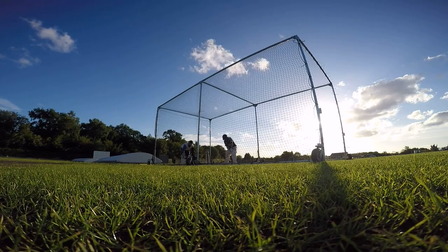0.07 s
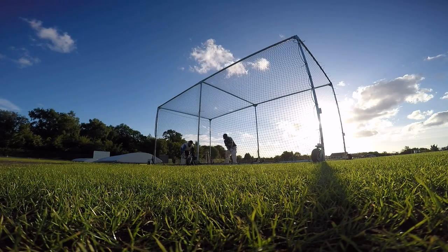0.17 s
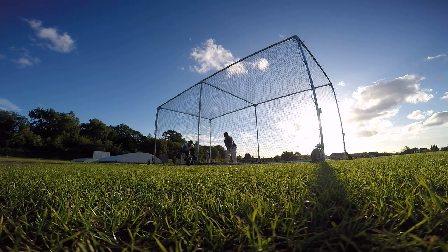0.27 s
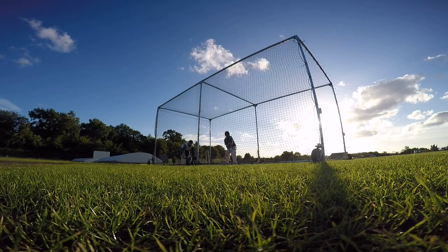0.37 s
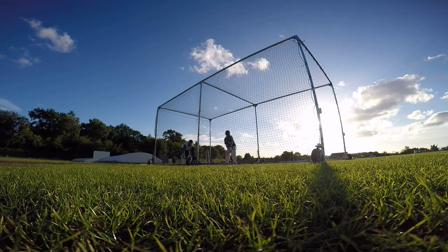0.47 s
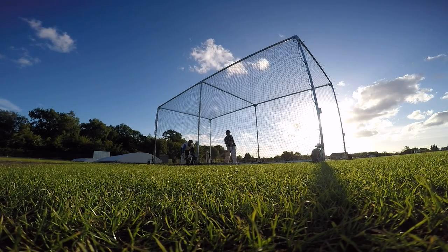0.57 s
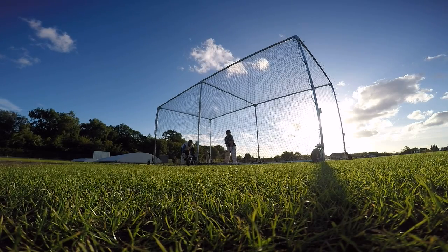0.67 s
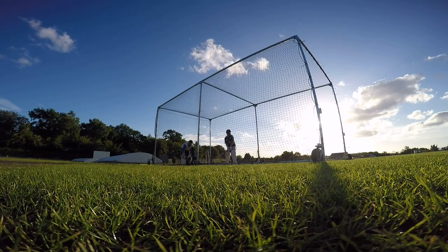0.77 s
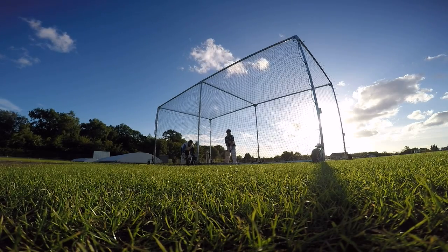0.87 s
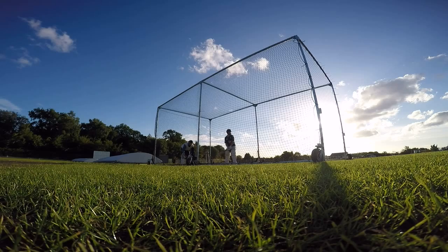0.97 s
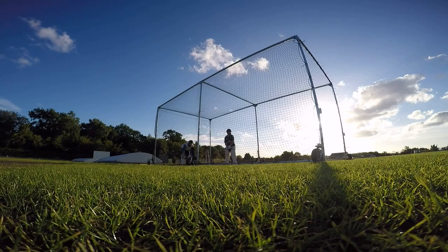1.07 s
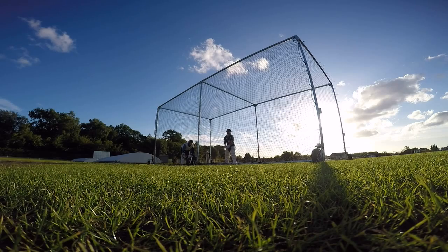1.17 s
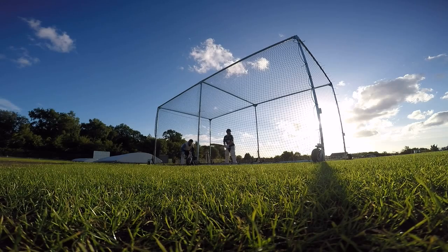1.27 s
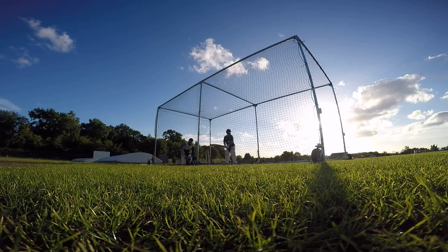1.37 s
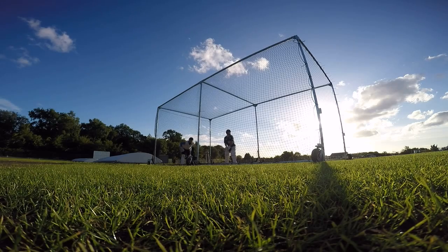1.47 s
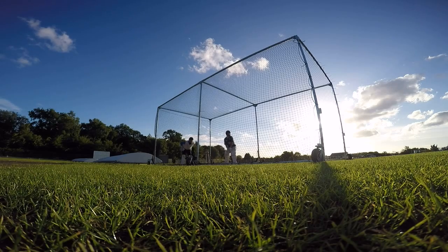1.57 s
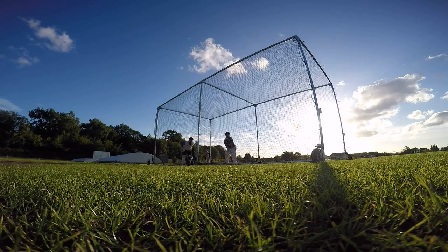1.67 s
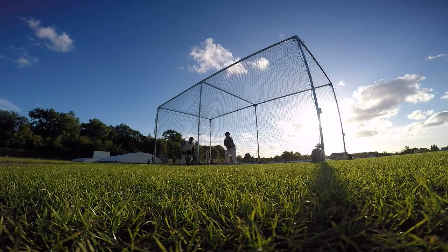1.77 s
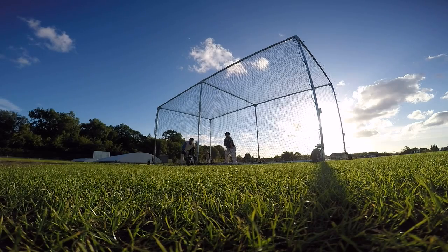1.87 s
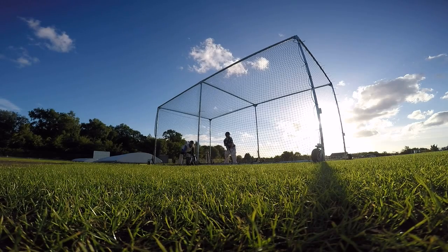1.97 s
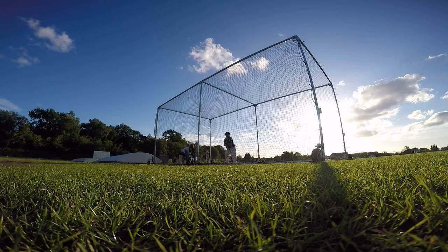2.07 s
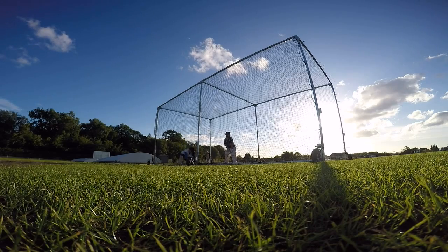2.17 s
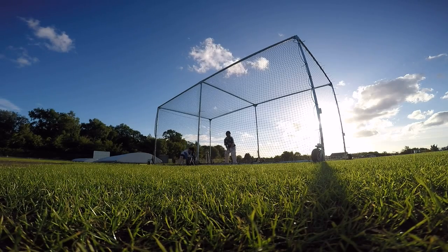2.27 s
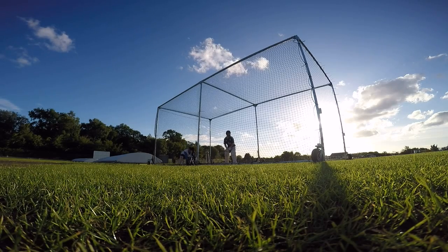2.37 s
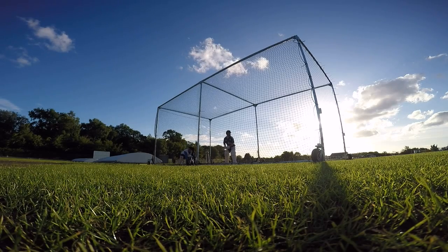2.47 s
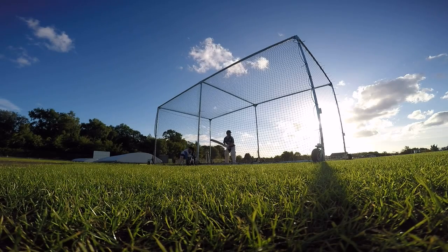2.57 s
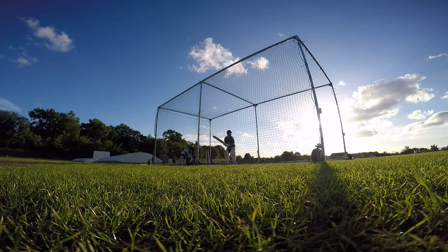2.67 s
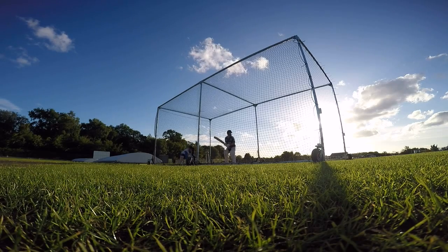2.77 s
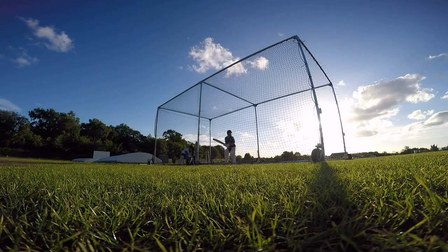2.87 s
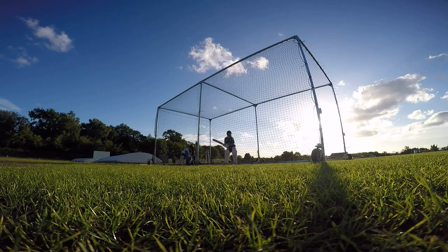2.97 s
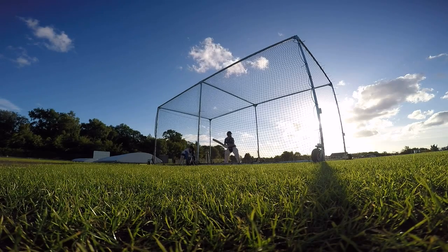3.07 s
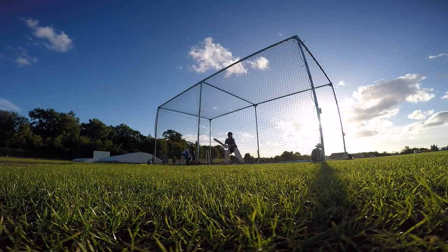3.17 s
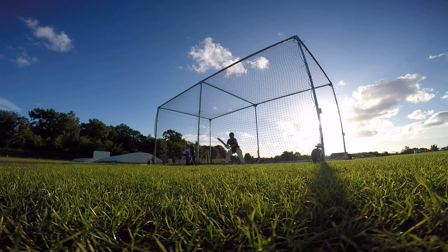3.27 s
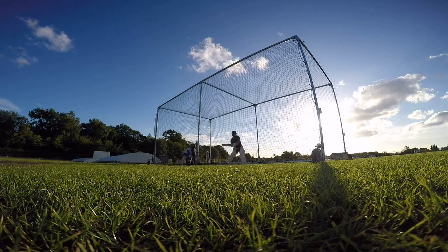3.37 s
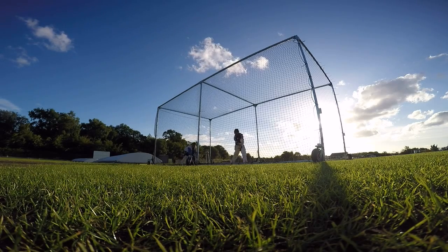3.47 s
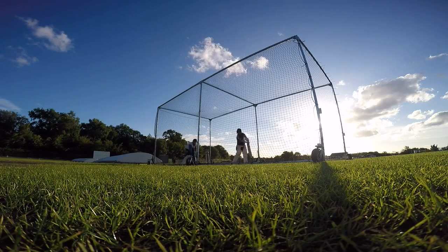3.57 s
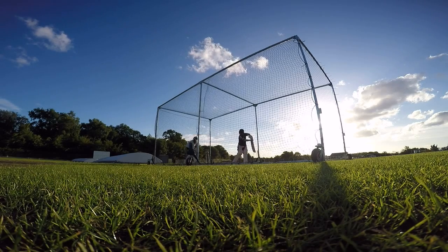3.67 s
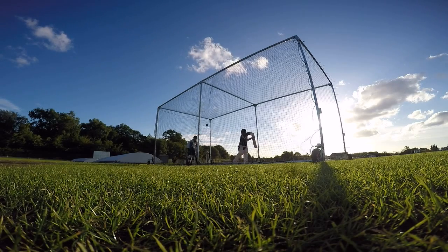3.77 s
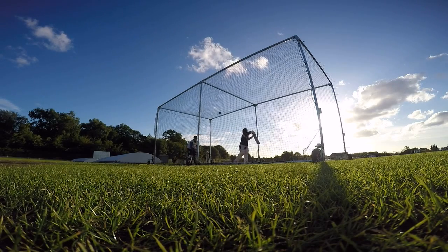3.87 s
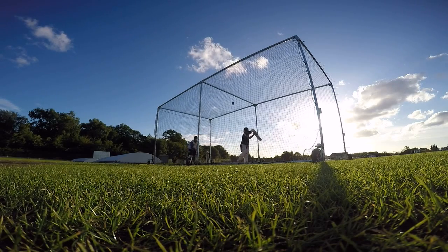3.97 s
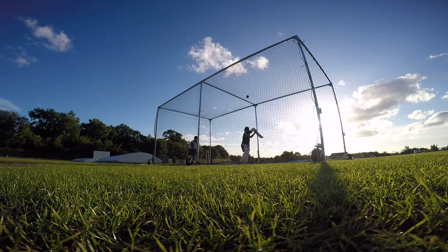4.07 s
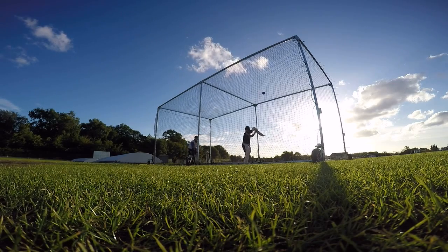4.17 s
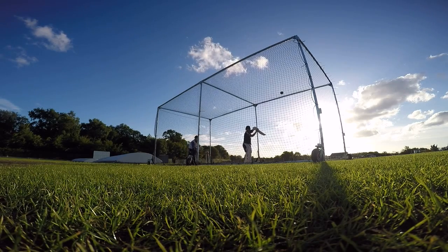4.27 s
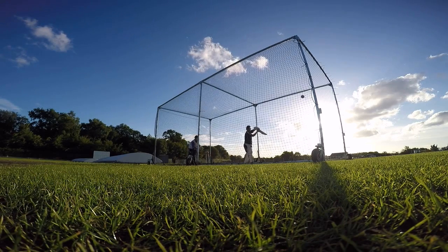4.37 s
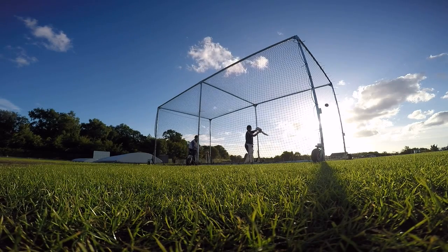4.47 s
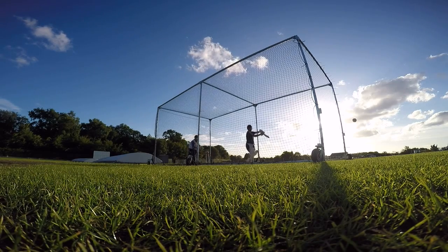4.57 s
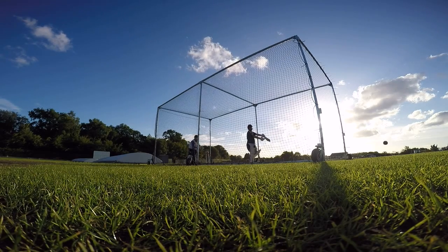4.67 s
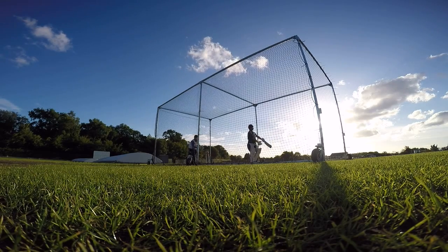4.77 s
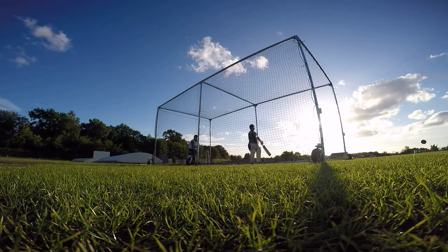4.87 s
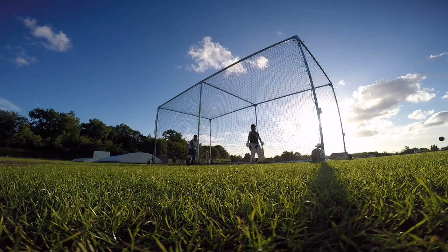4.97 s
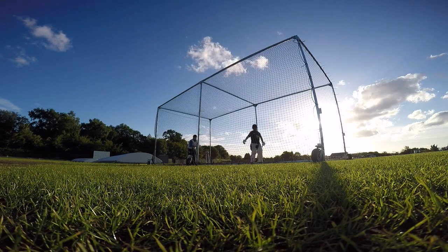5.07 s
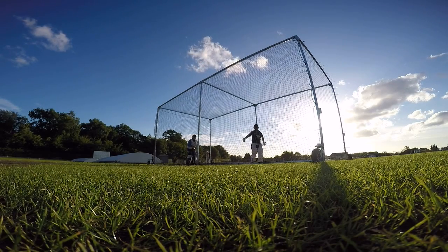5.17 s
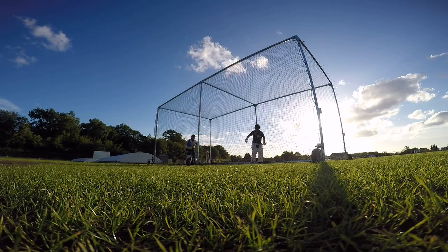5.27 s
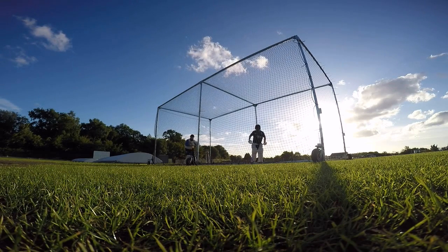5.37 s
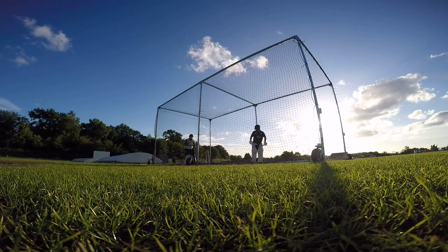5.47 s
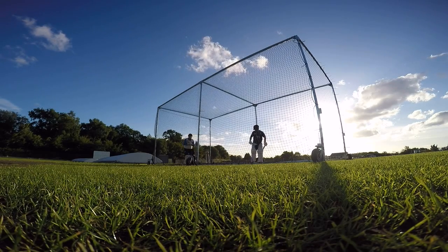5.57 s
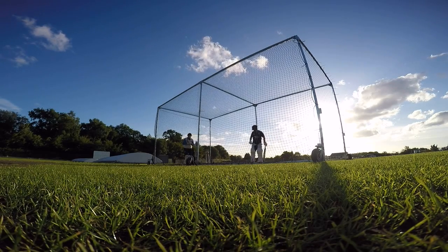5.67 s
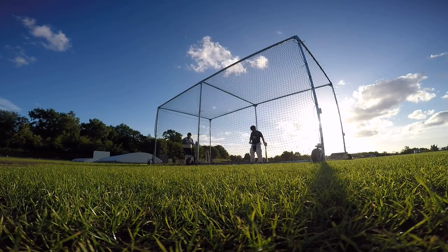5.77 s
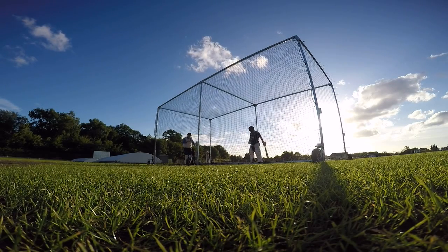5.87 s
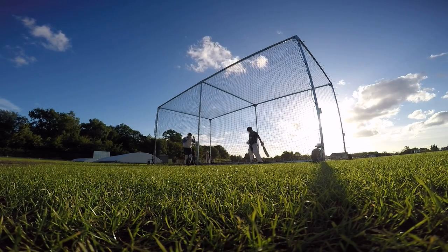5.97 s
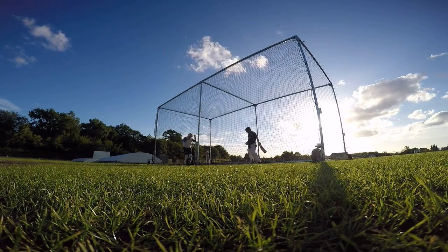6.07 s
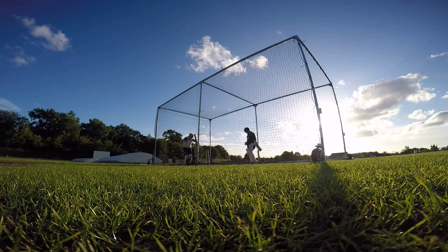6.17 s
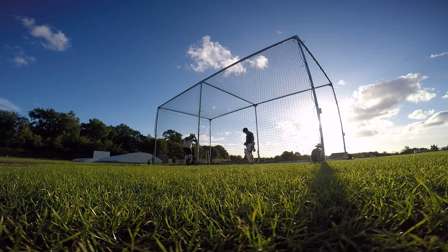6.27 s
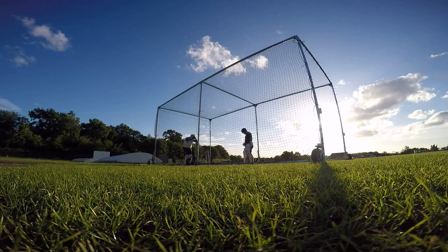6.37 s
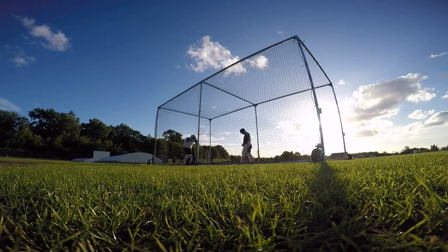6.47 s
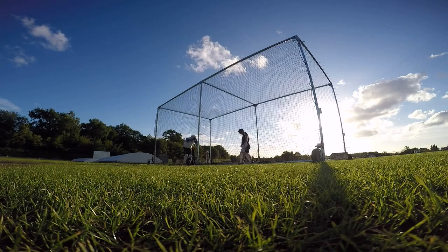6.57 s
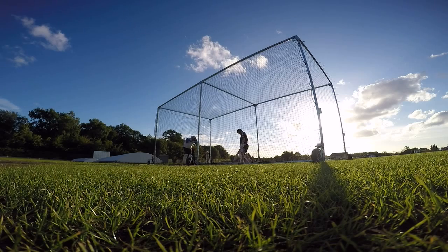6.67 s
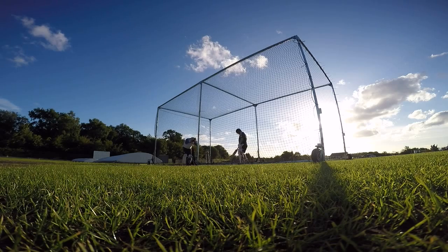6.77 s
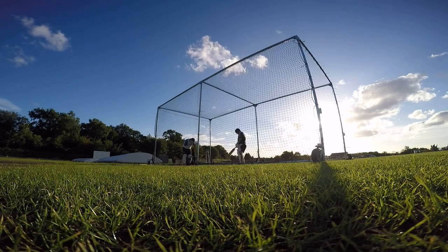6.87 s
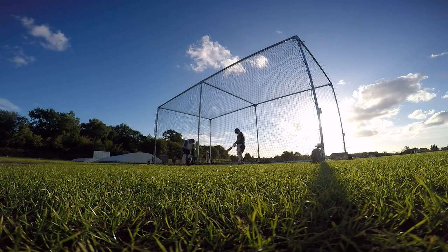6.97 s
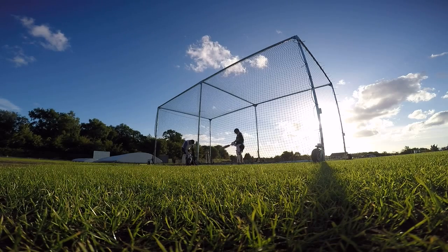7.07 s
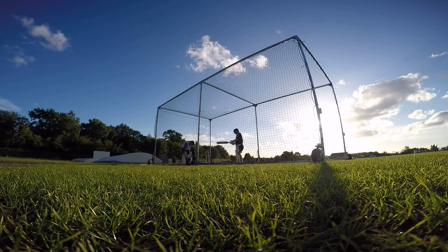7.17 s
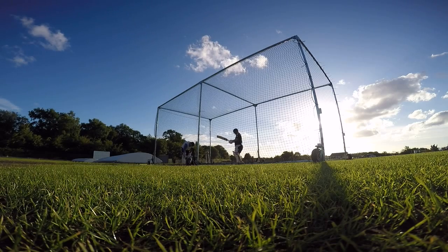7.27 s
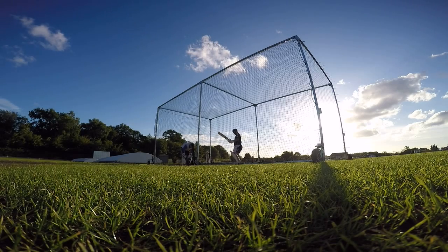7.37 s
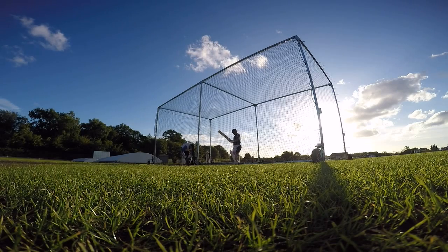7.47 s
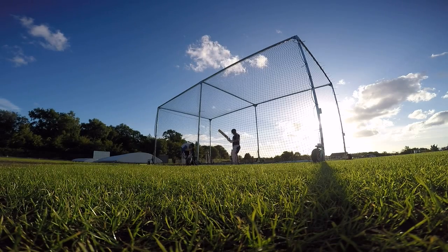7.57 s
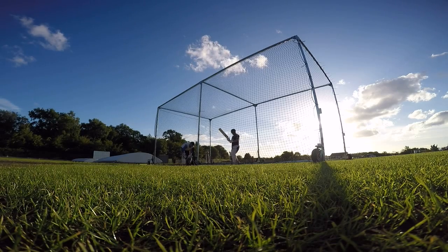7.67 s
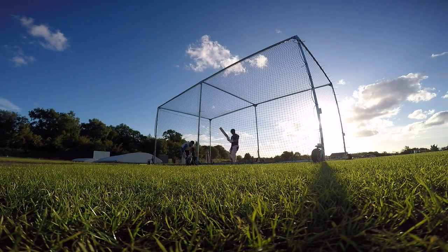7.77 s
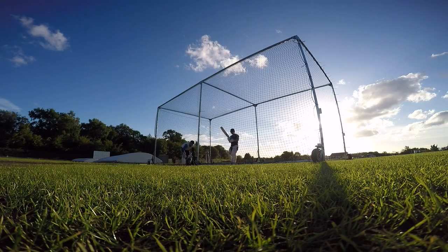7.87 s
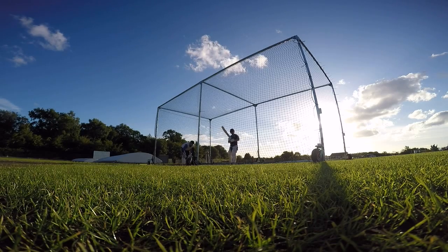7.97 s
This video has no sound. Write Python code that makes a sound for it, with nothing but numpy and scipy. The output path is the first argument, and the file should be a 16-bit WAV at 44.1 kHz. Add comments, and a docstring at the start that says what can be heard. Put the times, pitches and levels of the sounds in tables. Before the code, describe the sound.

Open grass field, heard by a small camera microphone with light wind rumble, faint hiss and a very thin high whine. A far propeller plane drones low throughout, swelling and fading unevenly, its pitch sinking slightly. A dull, dry bat knock lands at 0.05 s and another at 1.7 s, with faint thuds around them. Wind puffs near 0.8 and 2 s. From 2.7 s come soft heel-and-sole footfalls, strongest at 2.9, 3.2 and 3.4 s, with cloth rustle and a short hollow tok at 3.25 s. At 3.53 s one hard hit cracks, far louder, clipped, briefly ringing, with a quick echo; the background ducks and recovers within about 0.6 s. Netting ticks and crackles around 3.6-4 s, and the ball thuds into the net at 4.03 s. Muffled steps follow at 4.5, 4.8-4.9, 5.3 and 5.8 s. Then faint grass shuffles and the swelling drone remain until 8 s.

```python
"""Batting practice on grass

Two dull knocks of bat on ball, then one hard hit that overloads the microphone: gliding tones with ring and crack.
Footfalls, faint echoes of the hits and the ball dropping into the net are short pulses, some with a scuff.
Clothes, netting and gear rustle and tick as swells of gritty noise, with one short hollow tok.
A far propeller plane drones and sinks in pitch: harmonics over exhaust noise. Wind rumbles lightly as coloured
noise, and the camera's electronics whine faintly as two steady tones."""
import sys
import numpy as np
from scipy import signal
from scipy.fft import rfft, irfft, next_fast_len
from scipy.io import wavfile
from scipy.ndimage import uniform_filter1d, map_coordinates

SR = 44100
rng = np.random.default_rng(int(sys.argv[2]) if len(sys.argv) > 2 else 0)


def generate_wav(sig):
    """Save sig (samples, or channels by samples) to the path in sys.argv[1] as 16-bit PCM at SR."""
    pcm = np.round(np.clip(np.atleast_2d(sig).T, -1, 1) * 32767).astype(np.int16)
    wavfile.write(sys.argv[1], SR, pcm)


N = 354563  # length in samples, about 8 s


def amp(db):
    """Turn decibels into a gain."""
    return 10 ** (np.asarray(db) / 20)


def unit(x):
    """Scale a sound to rms 1."""
    return x / np.sqrt(np.mean(x ** 2) + 1e-20)


def along(points, hz):
    """Read a table of (f/Hz, value) at any frequency, on a log frequency axis."""
    f, v = np.transpose(points)
    return np.interp(np.log(hz + 1), np.log(f + 1), v)


def clock():
    """Give the time of each sample in seconds."""
    return np.arange(N) / SR


def curves(rows):
    """Join the points of each column after the time by straight lines, with a value for each sample."""
    s, *columns = np.transpose(rows)
    return [np.interp(clock(), s, column) for column in columns]


def wobble(rate):
    """Draw a smooth random curve with `rate` random points a second."""
    points = rng.standard_normal(int(N * rate / SR) + 4)
    return map_coordinates(points, [clock() * rate])


def filtered(x, response):
    """Multiply x by a gain that depends on frequency."""
    size = next_fast_len(len(x) + 8192)
    hz = np.fft.rfftfreq(size, 1 / SR)
    return irfft(rfft(x, size) * response(hz), size)[:len(x)]


def coloured(count, spectrum):
    """Make noise of rms 1 whose balance of low and high follows the spectrum."""
    return unit(filtered(rng.standard_normal(count), lambda hz: amp(along(spectrum, hz))))


def add(track, s, sound):
    """Mix a sound into the track from time s on."""
    i = max(round(s * SR), 0)
    track[i:i + len(sound)] += sound[:max(N - i, 0)]


# the camera's whine, one row: f/Hz, level/dB (rms), level/dB of the octave above (rms)
WHINE_TONE = (6308.7, -73.5, -74.5)
FRAME_HZ = 29.97  # frames per second


def whine():
    """A thin tone from the camera's electronics, with its octave; the lower one flips sign with every frame."""
    hz, db, octave_db = WHINE_TONE
    phase = 2 * np.pi * hz * clock()
    flip = np.tanh(10 * np.sin(np.pi * FRAME_HZ * clock()))
    tone = amp(db) * flip * np.sin(phase)
    octave = amp(octave_db) * np.sin(2 * phase)
    return np.sqrt(2) * (tone + octave)


# puffs of wind on the microphone: t/s of the middle, half length/s, level/dB before the buffet trim
GUSTS = [(.45, 0.07, -36), (0.79, .12, -29.5), (1.982, 0.1, -30.5), (2.074, 0.027, -22),
         (2.755, 0.17, -37.5), (3.202, 0.25, -31), (3.72, .08, -28), (4.94, .04, -30.5)]
CALM_DB = -40  # the breeze between the puffs, before the same trim
# colour of the wind's rumble: f/Hz, relative level/dB
BUFFET_COLOUR = [(8, -3.5), (25, 1.5), (38, 4), (60, -3.5), (90, -7), (150, -20), (300, -41), (1000, -82.5)]
# colour of the even hiss: f/Hz, relative level/dB
HISS_COLOUR = [(200, 2), (1000, 13.5), (2500, 3), (4200, 2), (6000, -1.5), (8000, -5.5), (12000, -8),
               (13500, -6.5), (15000, -34)]


def breeze(buffet_db, air_db, eddy_db, eddies_per_s):
    """Soft buffeting that swells with each puff and churns in small eddies, under a faint even hiss."""
    power = amp(CALM_DB) ** 2
    for s, half, db in GUSTS:
        power = power + amp(db) ** 2 * np.exp(-((clock() - s) / half) ** 2)
    churn = amp(buffet_db + eddy_db * wobble(eddies_per_s))
    rumble = np.sqrt(power) * churn * coloured(N, BUFFET_COLOUR)
    return rumble + amp(air_db) * coloured(N, HISS_COLOUR)


# pitch of the plane's propeller: t/s, f/Hz at which the blades pass
BLADE_RATE = [(0, 108.7), (1, 108.4), (1.6, 107), (4.4, 104.6), (7, 101.7), (8.04, 101.1)]
# its tones, fading in and out on the way through the air, before trims:
# t/s, level/dB of the first, of the second, of the third
DRONE_LEVELS = [(0.0, -22, -41.5, -37), (0.32, -29.5, -43, -54.5), (0.5, -29.5, -41.5, -48),
                (0.95, -32.0, -60.5, -58), (1.15, -40, -52, -58.5), (1.8, -32.5, -53, -56),
                (2.45, -46, -59.0, -67.5), (2.8, -44, -63, -61), (3.05, -32.5, -53, -74),
                (4.1, -33, -50.5, -63.5), (4.36, -28.5, -48, -50), (4.7, -37, -51.5, -63),
                (4.86, -29, -49, -65), (5.02, -38.5, -42.5, -53.5), (5.5, -24.5, -40, -43),
                (5.95, -26, -54.5, -54.5), (6.18, -41, -58, -55), (6.33, -31.5, -60.5, -52.5),
                (6.68, -38.5, -51.5, -57.5), (7.02, -25.5, -49.5, -46.5), (7.25, -24.0, -39.5, -50),
                (7.55, -27.5, -40, -39), (7.85, -24.0, -39.5, -57.5), (8.04, -23, -40, -62)]
# its exhaust roar: t/s, level/dB before the roar trim
ROAR_LEVEL = [(0, -44), (.25, -51), (1.5, -56), (2.5, -57.5), (3.6, -50), (4.1, -55), (5.5, -54.5),
              (6.7, -56.5), (7.55, -52), (8.04, -55.5)]
# colour of the exhaust: f/Hz, relative level/dB
EXHAUST_COLOUR = [(40, -24), (130, 4), (250, 5), (400, 4.5), (550, -1), (800, -14), (1200, -24.5),
                  (2200, -74), (5000, -51)]
FADE_GROWTH_DB = 1.58  # extra flutter of each higher harmonic, reached in full only in deep fades


def plane(tone_db, overtone_db, upper_db, roar_db, flutter_db):
    """Propeller harmonics over exhaust noise; turbulence makes higher ones flutter more, most of all in fades."""
    phase = 2 * np.pi * np.cumsum(curves(BLADE_RATE)[0]) / SR
    first, second, third = curves(DRONE_LEVELS)
    # the fourth harmonic follows the third, at its own trim
    levels = [first + tone_db, second + overtone_db, third + overtone_db, third + upper_db]
    tones = np.zeros(N)
    for k, db in enumerate(levels, 1):
        faded = np.clip((db.max() - db) / 12, .35, 1)
        flutter = faded * (flutter_db + (k - 1) * FADE_GROWTH_DB) * wobble(9)
        angle = k * (phase + 0.1 * wobble(7)) + rng.uniform(0, 2 * np.pi)
        tones += amp(db + flutter) * np.sin(angle)
    roar_level = curves(ROAR_LEVEL)[0] + roar_db + 1.2 * wobble(9)
    return np.sqrt(2) * tones + amp(roar_level) * coloured(N, EXHAUST_COLOUR)


# rubs of clothes and netting, and one short hollow tok near 400 Hz:
# t/s of the middle, half length/s, level/dB (rms), centre f/Hz, width/octaves
RUSTLES = [(2.939, .036, -54.5, 1890, .63), (2.961, 0.01, -43, 480, 0.81), (3.06, .079, -60.5, 1560, 0.74),
           (3.18, 0.045, -56.5, 2180, .5), (3.253, 0.0074, -30, 400, .1), (3.49, 0.032, -51.5, 2500, 0.99),
           (3.631, .013, -42, 600, .97), (3.679, .012, -51, 3100, .9), (3.745, 0.078, -56.5, 3300, 2.3),
           (3.98, 0.048, -57, 1700, 1.9), (4.119, 0.2, -62, 1500, 0.61)]


def rustles_and_tok():
    """List the rubs of clothes and netting as broad bands, and the hollow tok as a very narrow one."""
    return list(RUSTLES)


# light shuffles in the grass: t/s, half length/s, level/dB (rms)
SHUFFLES = [(1.707, .012, -62), (1.944, .008, -59.5), (5.014, 0.0093, -55), (5.759, 0.016, -59.5),
            (5.87, .06, -64), (6.324, 0.016, -58), (6.7, 0.088, -65.5), (6.889, .016, -61),
            (7.302, .019, -62), (7.636, .012, -59), (7.72, 0.23, -68)]
SHUFFLE_HZ, SHUFFLE_OCTAVES = 2130, 0.93


def shuffles():
    """List the small movements in the grass as soft, broad rubs."""
    return [(s, half, db, SHUFFLE_HZ, SHUFFLE_OCTAVES) for s, half, db in SHUFFLES]


# sharp little ticks of gear and netting: t/s, level/dB (rms), f/Hz
TICKS = [(3.371, -39, 2980), (3.5851, -28.5, 3700), (3.664, -39.5, 3800), (3.755, -48, 4220),
         (3.941, -39.5, 1690), (3.959, -32, 1390), (4.262, -50.5, 2860), (4.801, -38.5, 3050)]
TICK_HALF_S, TICK_OCTAVES = 0.00054, 0.28
# the struck netting crackles: t/s at one end, signed span/s to the other, level/dB of a tick (rms), f/Hz
NET_CRACKLE = (4, -0.16, -53, 3700)


def ticks():
    """List the ticks as very short narrow rubs, with eight more at random moments for the struck net."""
    end, span, net_db, net_hz = NET_CRACKLE
    crackle = [(end + span * u, net_db, net_hz) for u in rng.random(size=8)]
    return [(s, TICK_HALF_S, db, hz, TICK_OCTAVES) for s, db, hz in list(TICKS) + crackle]


# paired contacts, played by scuffs and by impacts: mostly feet, heel then sole;
# the one at 3.585 s is the hard hit's echo, the one near 4.03 s the ball dropping into the net
# t/s of the second contact, level/dB (peak), thud f/Hz, click level/dB against the thud,
# lead/s of the first contact, its level/dB (peak), scuff level/dB (rms)
PAIRS = [(2.698, -34.5, 356, -19, 0.00686, -24.5, -46), (2.8901, -11.5, 293, -23, .012, -26.5, -39),
         (3.219, -13, 380, -26.5, 0.01, -32, -35.5), (3.585, -11, 363, -25, .0036, -18, -42),
         (4.0312, -16.5, 460, -24, 0.019, -31, -39.5), (4.4647, -21.5, 396, -28, .0117, -24, -45.5),
         (4.8986, -29, 400, -16, 0.0036, -26.5, -42), (5.3421, -21.5, 405, -20, 0.012, -26, -59)]
SCUFF_HZ, SCUFF_OCTAVES = 850, 0.86
SCUFF_SPREAD = 0.53  # half length as a share of the time between the two contacts


def scuffs():
    """List a soft rub midway through each pair; for a foot, the sole brushing the grass as it rolls."""
    return [(s - lead / 2, SCUFF_SPREAD * lead, scuff_db, SCUFF_HZ, SCUFF_OCTAVES)
            for s, *_, lead, first_db, scuff_db in PAIRS]


def gritty_noise(swells, grain_db, grains_per_s, top_hz):
    """Short swells of noise whose uneven loudness makes them gritty, each in its own band."""
    track = np.zeros(N)
    t = np.arange(-SR // 2, SR // 2) / SR
    for s, half, db, centre_hz, octaves in swells:
        knots = rng.standard_normal(SR // 20)
        near = np.abs(t) < 4 * half + .01  # only the stretch where the swell is heard
        grit = np.interp((t[near] - t[0]) * grains_per_s, np.arange(len(knots)), knots)
        grains = rng.standard_normal(len(t))[near] * amp(grain_db * grit)

        def band(hz):
            hump = np.exp(-.5 * (np.log2((hz + 1) / centre_hz) / octaves) ** 2)
            return hump / (1 + (hz / top_hz) ** 6)

        swell = np.exp(-.5 * (t[near] / half) ** 2)
        sound = swell * filtered(grains, band)
        level = amp(db) * np.linalg.norm(swell) / np.linalg.norm(sound)
        add(track, s + t[near][0], level * sound)
    return track


# single dull thuds: footfalls, landings, the ball near 3.98 s, the faint echo after each of the first two
# knocks, and a low lump of body just after the second knock # t/s, level/dB (peak), thud f/Hz, click level/dB
# against the thud
THUDS = [(.091, -31.5, 640, -30), (1.7035, -23.5, 213, -34), (1.737, -31.5, 510, -29),
         (2.3047, -32.5, 396, -18.5), (3.3691, -16, 348, -29.5), (3.625, -27, 450, -24),
         (3.979, -23.5, 427, -22), (4.801, -18, 337, -19), (5.7587, -32, 400, -14)]
# colour of a thud, shifted to each one's own pitch: f/Hz, relative level/dB
THUD_COLOUR = [(40, -65.5), (120, 2), (240, -0.5), (330, 2.5), (400, 7.5), (500, 2.5), (700, -13),
               (900, -46), (2000, -60), (5000, -79)]
THUD_HZ = 400  # the pitch the thud colour is written for
# colour of a click: f/Hz, relative level/dB
CLICK_COLOUR = [(150, -14.5), (700, 4.5), (1600, 3.5), (2200, -2.5), (2600, -2.5), (3100, -8),
                (3700, -45.5), (6000, -33.5), (15000, -59)]
FIRST_HZ, FIRST_CLICK_DB = 432, -19  # first contact of a pair: thud pitch, and click against the thud


def impacts(lag_hz, size=4096):
    """Each contact or echo is one causal pulse: a heavily damped thud, plus a click at its own level."""
    track = np.zeros(N)
    hz = np.fft.rfftfreq(size, 1 / SR)
    dispersion = (lag_hz - 1j * hz) / (lag_hz + 1j * hz)  # the lows trail the highs
    seconds = [pair[:4] for pair in PAIRS]
    firsts = [(s - lead, first_db, FIRST_HZ, FIRST_CLICK_DB) for s, *_, lead, first_db, scuff_db in PAIRS]
    for s, db, pitch_hz, click_db in list(THUDS) + seconds + firsts:
        thud = amp(along(THUD_COLOUR, hz * THUD_HZ / pitch_hz))
        click = amp(click_db + along(CLICK_COLOUR, hz))
        cepstrum = irfft(np.log(np.hypot(thud, click) + 1e-6))
        # minimum phase keeps the onset sharp
        sharp = np.exp(rfft(2 * cepstrum[:size // 2], size))
        pulse = irfft(dispersion * sharp)
        add(track, s, amp(db) * pulse / np.abs(pulse).max())
    return track


# bat on ball: t/s, thud level/dB (peak), starting f/Hz, settled f/Hz, glide/s, rise/s,
# time to fall 60 dB/s, ring level/dB against the thud's peak
KNOCKS = [(.048, -6.5, 1790, 375, .00075, .0024, .012, -25),
          (1.693, -6.4, 780, 405, .00075, .0035, .0105, -33),
          (3.5332, 8.4, 1480, 276, .00075, .003, .007, -10)]
# the blade's brief ring: f/Hz, level/dB within the ring, time to fall 60 dB/s
BLADE_RING = [(1120, 0, .025), (1550, -12, .018), (2670, -5, .011)]
# colour of the noisy part of the crack: f/Hz, relative level/dB
CRACK_COLOUR = [(500, -20), (1000, -0.5), (1400, 3), (2100, -13.5), (3100, -7), (3900, -26), (5000, -19),
                (7000, -35), (15000, -50.5)]
CRACK_DB, CRACK_T60_S = -17, .03  # starting level against the ring, and time to fall 60 dB


def bat():
    """Each knock glides down quickly to a damped wooden thud; the blade rings briefly under a burst of noise."""
    track = np.zeros(N)
    t = np.arange(SR // 10) / SR
    for s, db, start_hz, end_hz, glide_s, rise_s, t60_s, ring_db in KNOCKS:
        cycles = end_hz * t + (start_hz - end_hz) * glide_s * (1 - np.exp(-t / glide_s))
        swell = (1 - np.exp(-t / rise_s)) ** 2 * amp(-60 * t / t60_s)
        thud = swell / swell.max() * np.sin(2 * np.pi * cycles)
        ring = sum(amp(level - 60 * t / life) * np.sin(2 * np.pi * hz * t) for hz, level, life in BLADE_RING)
        crack = amp(CRACK_DB - 60 * t / CRACK_T60_S) * coloured(len(t), CRACK_COLOUR)
        add(track, s, -amp(db) * (thud + amp(ring_db) * (ring + crack)))
    return track


def scatter(x, decay, low_hz):
    """A diffuse tail; small things reflect little bass, and each frequency dies at its own speed."""
    hz, t, z = signal.stft(rng.standard_normal(SR), SR, nperseg=256)
    fading = amp(-60 * t / along(decay, hz)[:, None])
    tail = signal.istft(z * fading, SR, nperseg=256)[1]
    bass_cut = signal.butter(2, low_hz, "high", fs=SR, output="sos")
    tail = signal.sosfilt(bass_cut, tail / np.linalg.norm(tail))
    return signal.fftconvolve(x, tail)[:N]


# scatter from the frame and the ground: f/Hz, time to fall 60 dB/s
NEAR_DECAY = [(200, 0.099), (1200, 0.14), (3000, 0.075), (10000, .05)]
# scatter from far trees: f/Hz, time to fall 60 dB/s
FAR_DECAY = [(200, .6), (1200, 0.95), (2200, 0.63), (4000, .6), (10000, .2)]


def field(x, near_db, far_db, glint_db):
    """Open ground: a brief bright scatter off frame and grass, a duller one behind it, a faint wash from trees."""
    glint = amp(glint_db) * scatter(x, [(1000, .04), (12000, .05)], low_hz=5040)
    near = amp(near_db) * scatter(x, NEAR_DECAY, low_hz=890)
    far = amp(far_db) * scatter(x, FAR_DECAY, low_hz=1300)
    return x + glint + near + far


def scene():
    """The batter and the ball on the field, with plane and breeze behind."""
    air = breeze(buffet_db=3.0, air_db=-62.5, eddy_db=2.5, eddies_per_s=14)
    drone = plane(tone_db=0, overtone_db=1.5, upper_db=-16.5, roar_db=7.5, flutter_db=1.37)
    swells = rustles_and_tok() + scuffs() + shuffles() + ticks()
    close = impacts(lag_hz=600) + gritty_noise(swells, grain_db=3.5, grains_per_s=430, top_hz=3500)
    close = close + amp(-14.5) * scatter(close, NEAR_DECAY, low_hz=303.5)
    knocks = field(bat(), near_db=-16, far_db=-26, glint_db=-7)
    return (whine() + air + drone + close + knocks)[None]


def ducked(x, most_db, hold_s, release_s, lag_s, attack_s):
    """Gain control: an overload turns the gain down a moment later; it holds, then creeps back."""
    last_overload = np.maximum.accumulate(np.where(np.abs(x) > 1, clock(), -np.inf))
    age = clock() - last_overload
    depth = np.clip(1 - (age - hold_s) / release_s, 0, 1)
    depth = uniform_filter1d(depth, int(attack_s * SR))
    delayed = np.interp(clock() - lag_s, clock(), depth, left=0)
    return x * amp(-most_db * delayed)


TOP_HZ = 15400  # the camera's band limit


def record(dry):
    """The camera ducks after an overload, saturates at full scale and keeps nothing above its band limit."""
    x = ducked(dry[0], most_db=6, hold_s=.17, release_s=.45, lag_s=.0043, attack_s=.003)
    x = x / (1 + np.abs(x) ** 3.5) ** (1 / 3.5)
    return filtered(x, lambda hz: hz < TOP_HZ)[None]


dry = scene()
out = record(dry)
generate_wav(out)
```